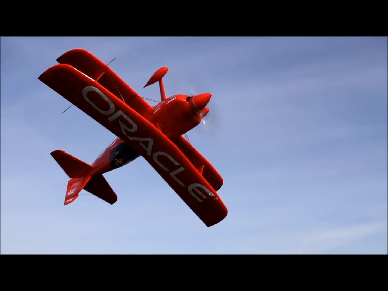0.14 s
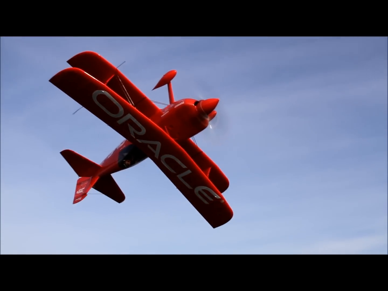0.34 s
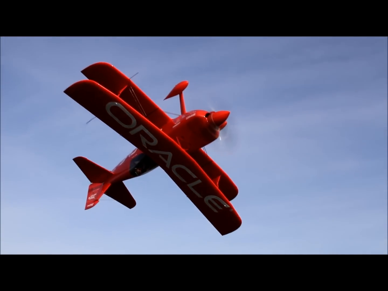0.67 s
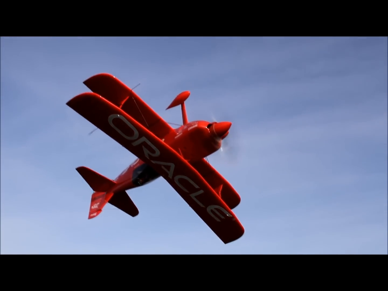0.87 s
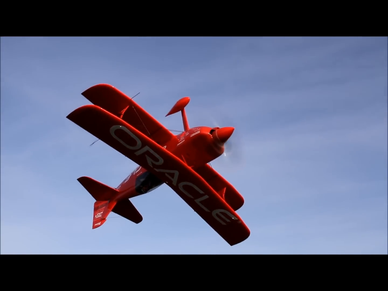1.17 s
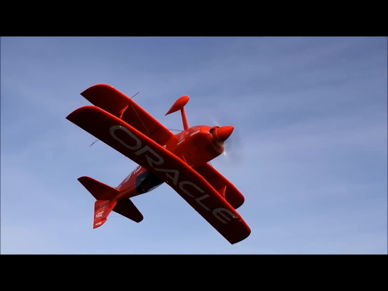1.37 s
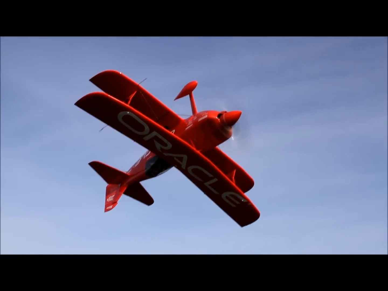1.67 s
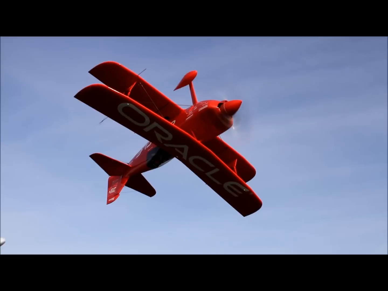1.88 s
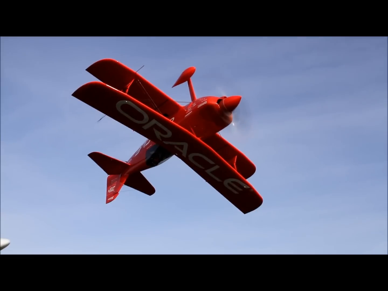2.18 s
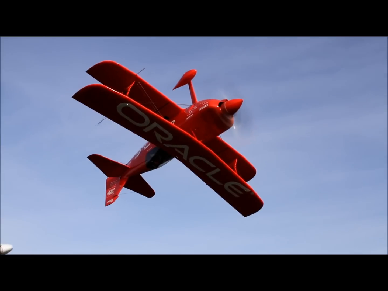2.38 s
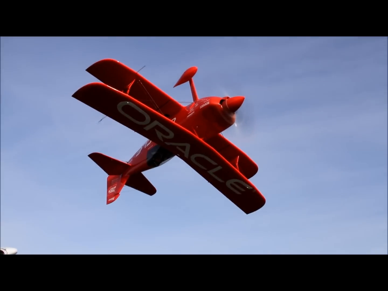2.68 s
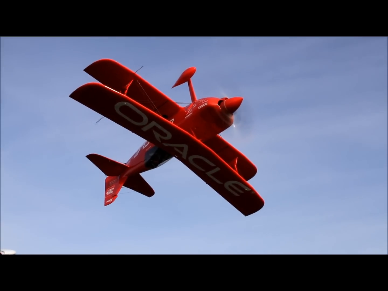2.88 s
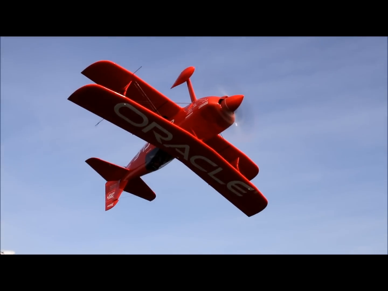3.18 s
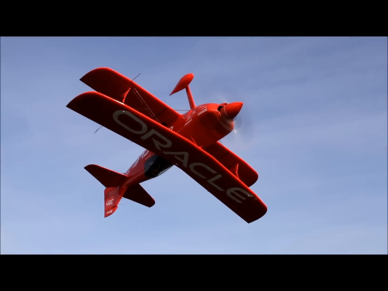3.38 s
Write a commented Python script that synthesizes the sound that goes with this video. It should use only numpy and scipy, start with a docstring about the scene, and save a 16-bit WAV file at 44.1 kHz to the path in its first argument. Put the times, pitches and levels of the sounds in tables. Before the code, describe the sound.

A biplane drones close alongside another small plane, with gusty wind sputtering on the microphone.

```python
"""Biplane close alongside

An aerobatic biplane flies beside the small plane that carries the microphone. Both engines drone
under the rush of the slipstream; one short rap sounds nearby. Gusts of low buffeting push the
microphone to its limit, which chops drone and hiss into a sputter. A low cut thins the rumble."""
import sys
import numpy as np
from scipy import signal
from scipy.fft import rfft, irfft
from scipy.io import wavfile
from scipy.ndimage import uniform_filter1d

SR = 44100
rng = np.random.default_rng(int(sys.argv[2]) if len(sys.argv) > 2 else 0)


def dump(signal):
    """Clip the signal to [-1, 1] and save it as 16-bit WAV at the path in sys.argv[1]."""
    limited = np.clip(np.atleast_2d(signal).T, -1, 1)
    pcm = np.round(limited * 32767).astype(np.int16)
    wavfile.write(sys.argv[1], SR, pcm)


N = 156114


def undb(db):
    """Decibels to gain."""
    return 10 ** (np.asarray(db) / 20)


def curve(rows):
    """Linear interpolation through (seconds, value) rows."""
    return np.interp(np.arange(N) / SR, *np.array(rows).T)


def walk(rate_hz):
    """Random steps at rate_hz, smoothed twice; standard deviation 1."""
    hold = int(SR / rate_hz)
    steps = rng.standard_normal(N)[np.arange(N) // hold]
    smooth = uniform_filter1d(uniform_filter1d(steps, hold), hold)
    return smooth / smooth.std()


def noise(spectrum):
    """Noise of rms 1, shaped by (Hz, dB) rows."""
    hz, db = np.array(spectrum).T
    bin_hz = np.maximum(np.fft.rfftfreq(N, 1 / SR), 1)
    shape = undb(np.interp(np.log(bin_hz), np.log(hz), db))
    shaped = irfft(rfft(rng.standard_normal(N)) * shape, N)
    return shaped / shaped.std()


def tone(hz):
    """Sine of rms 1 along a pitch curve."""
    return np.sqrt(2) * np.sin(2 * np.pi * (np.cumsum(hz) / SR + rng.random()))


def harmonics(base_hz, lines, waver_db=1.55):
    """Harmonics of a turning rate, each wavering in the moving air."""
    return sum(undb(db + waver_db * walk(rate_hz=9)) * tone(k * base_hz) for k, db in lines)


def gust_gain():
    """Strength of the buffeting: 1 between gusts, each gust a bell curve of added power."""
    # Each row: centre in seconds, half length in seconds, strength in dB re steady buffeting.
    gusts = [(.30, 0.046, 2.5), (0.494, 0.012, 4), (0.606, 0.03, 7.5), (0.675, 0.0076, 14),
             (0.764, 0.052, 4.5), (0.889, 0.032, 7), (0.961, 0.011, 8.5), (1.28, .035, 2),
             (1.423, 0.012, 5.5), (1.58, .03, -1), (1.663, 0.0081, 8), (1.719, 0.0093, 12),
             (1.99, 0.018, 4), (2.064, 0.032, 5.5), (2.194, 0.009, 8.5), (2.282, 0.0098, 11.5),
             (2.361, .02, 1.5), (2.524, .005, 7.5), (2.657, .02, -9), (2.822, 0.015, 9), (3.051, 0.017, 8),
             (3.146, 0.013, 7.5), (3.181, 0.012, 9.5), (3.211, 0.0051, 14.5), (3.243, 0.0073, 13),
             (3.544, 0.013, 14.5)]
    t = np.arange(N) / SR
    power = sum(undb(db) ** 2 * np.exp(-((t - at_s) / half_s) ** 2) for at_s, half_s, db in gusts)
    return np.sqrt(1 + power)


def slipstream(gust):
    """Broad rush of air: follows the airspeed, flutters, rises a little in gusts."""
    # Each row: time in seconds, level due to airspeed in dB.
    airflow = [(0, 0), (.17, -0.4), (.27, 0), (.47, 0.6), (.53, -1.5), (.6, -2.5), (.65, 2.6), (.88, -0.2),
               (1.04, 0), (1.14, 4), (1.3, 0.2), (1.68, 0.5), (1.84, -0.5), (2.03, 0), (2.17, 4),
               (2.38, -1.5), (2.5, 1), (2.63, -1), (2.91, 2.3), (3.15, -2), (3.3, 1.5), (3.54, -1)]
    # Each row: frequency in Hz, relative spectral density in dB.
    rush_spectrum = [(60, -7.5), (150, 0.5), (300, 1), (500, -6.5), (700, -6), (1000, -11), (2000, -16),
                     (3300, -17.5), (5000, -23), (6500, -25.5), (8300, -25.5), (10500, -29), (13500, -24),
                     (16000, -31)]
    base_db, flutter_db, gust_share = -18, 1.27, 0.088
    level_db = base_db + curve(airflow) + flutter_db * walk(rate_hz=38)
    return gust ** gust_share * undb(level_db) * noise(rush_spectrum)


def buffeting(gust):
    """Low eddies plus air pulsing in the open cabin, even in strength but for the gusts."""
    # Each row: frequency in Hz, relative spectral density in dB.
    eddy_spectrum = [(8, -2.5), (22, 1.5), (33, 3), (48, 1), (70, -3), (105, -7), (160, -22), (400, -53.5)]
    throb_hz, throb_wander, throb_re_eddies_db = 48.51, 0.06055, 1.5
    steady_db, rms_window_s = -11.5, 0.0715
    throb = tone(throb_hz * (1 + throb_wander * walk(rate_hz=20)))
    rumble = noise(eddy_spectrum) + undb(throb_re_eddies_db) * throb
    rms = np.sqrt(uniform_filter1d(rumble ** 2, int(rms_window_s * SR)))
    return undb(steady_db) * gust * rumble / rms


def knock(start_s):
    """One dull rap near the microphone: three fast-decaying modes."""
    # Each row: frequency in Hz, level in dB, 60 dB decay time in seconds.
    modes = [(620, -12, .016), (1080, -6, .02), (1430, -7, .02)]
    t = np.maximum(np.arange(N) / SR - start_s, 0)
    return sum(undb(db) * np.exp(-np.log(1000) * t / t60_s) * np.sin(2 * np.pi * hz * t)
               for hz, db, t60_s in modes)


def drone_swell_db():
    """Swell and fade of the engine drone."""
    # Each row: time in seconds, level in dB.
    swell = [(0, 2), (.2, 0), (.33, -1), (.47, -6), (.53, 6.5), (.6, -3), (.68, 2), (.83, 4), (1.02, -4.5),
             (1.19, 9.5), (1.32, 4), (1.45, 1.5), (1.63, -6.5), (1.87, 7), (2.0, 2), (2.17, -4.5),
             (2.32, 2), (2.45, 6), (2.52, 0), (2.65, -4), (2.75, 0), (2.83, -3), (2.92, 3), (3.02, -1),
             (3.1, 7.5), (3.19, -20), (3.28, 8), (3.38, -2.5), (3.54, -5)]
    return curve(swell)


def carrying_plane(swell_db):
    """Engine of the plane with the microphone: shaft harmonics and rough exhaust roar."""
    # Each row: multiple of the shaft rate, level in dB.
    shaft_lines = [(3, -30.5), (6, -22), (12, -41), (14, -35)]
    # Each row: frequency in Hz, relative spectral density in dB.
    exhaust_spectrum = [(130, -11), (240, 1), (310, -2.5), (450, -10), (700, -17), (1500, -32.5)]
    shaft_hz, exhaust_db = 38.48, -26.5
    drone = harmonics(np.full(N, shaft_hz), shaft_lines)
    roar = undb(exhaust_db) * noise(exhaust_spectrum)
    return undb(swell_db) * (drone + roar)


def biplane(swell_db, swell_share=0.17):
    """Propeller drone: harmonics of a drifting blade rate, with a small share of the swell."""
    # Each row: time in seconds, blade rate in Hz.
    blade_rate = [(0, 140), (.4, 139.3), (.9, 138.3), (1.3, 137.8), (1.75, 140.8), (2.05, 139.6),
                  (2.35, 138), (2.8, 139.5), (3.2, 140.1), (3.54, 139.3)]
    # Each row: multiple of the blade rate, level in dB.
    blade_lines = [(1, -21.5), (2, -24.5), (3, -28.5), (4, -34), (5, -38.5), (6, -77)]
    return undb(swell_share * swell_db) * harmonics(curve(blade_rate), blade_lines)


def scene():
    """Air pressure at the microphone, mono: two engines, wind, one rap."""
    swell_db, gust = drone_swell_db(), gust_gain()
    engines = biplane(swell_db) + carrying_plane(swell_db)
    return (engines + buffeting(gust) + slipstream(gust) + knock(start_s=2.5165))[None]


def record(dry):
    """Microphone: saturates, nearly deaf while pinned, sags under long overload; low and top cut."""
    limit_db, knee_hardness, leak_db = -8, 5.3, -39.5
    sag_db, sag_window_s, gain_db = -4, 0.039, 1
    low_cut_hz, low_cut_q, top_cut_hz = 131.4, 0.73, 15950
    drive = np.abs(dry / undb(limit_db))
    saturated = dry / (1 + drive ** knee_hardness) ** (1 / knee_hardness) + undb(leak_db) * dry
    overload = uniform_filter1d(np.clip(drive - 1, 0, 1), int(sag_window_s * SR))
    omega = 2 * np.pi * low_cut_hz
    low_cut = signal.bilinear([1, 0, 0], [1, omega / low_cut_q, omega ** 2], SR)
    thinned = signal.lfilter(*low_cut, saturated)
    top_cut = signal.ellip(12, .1, 90, top_cut_hz, fs=SR, output="sos")
    return signal.sosfilt(top_cut, undb(gain_db + sag_db * overload) * thinned)


dry = scene()
out = record(dry)
dump(out)
```